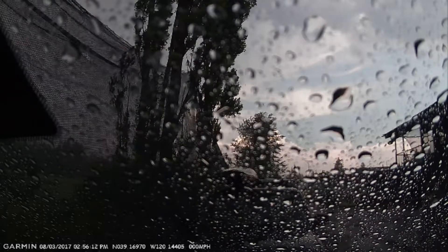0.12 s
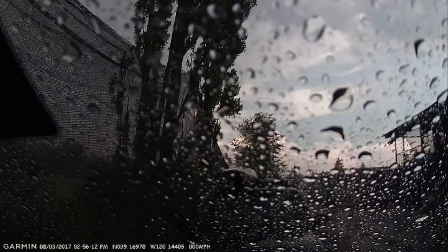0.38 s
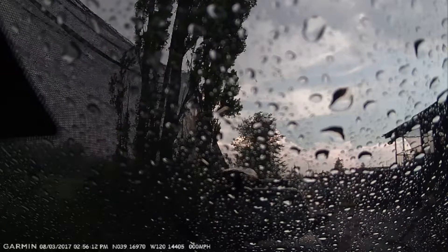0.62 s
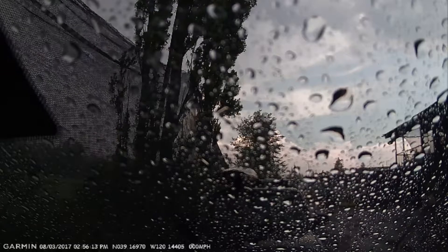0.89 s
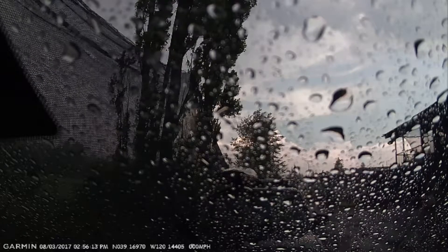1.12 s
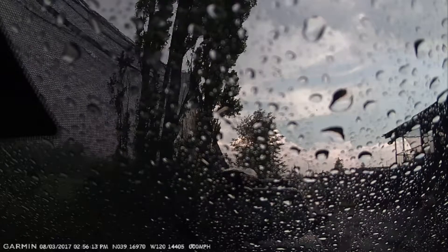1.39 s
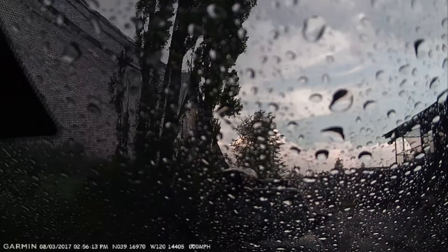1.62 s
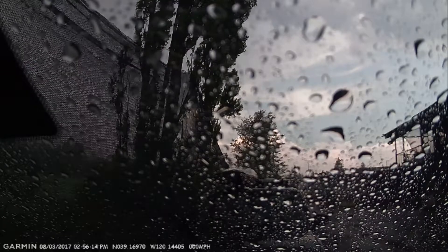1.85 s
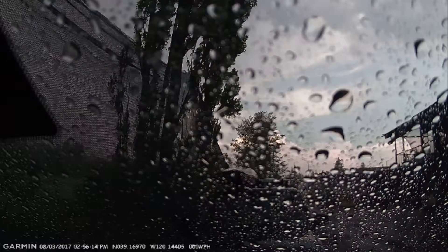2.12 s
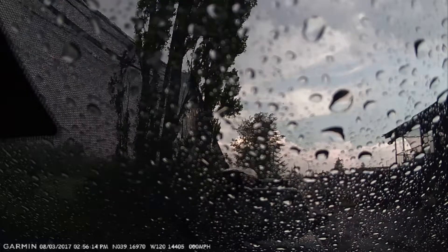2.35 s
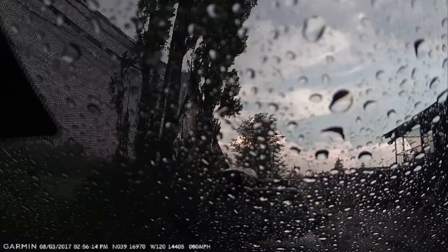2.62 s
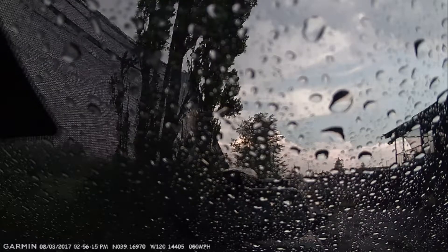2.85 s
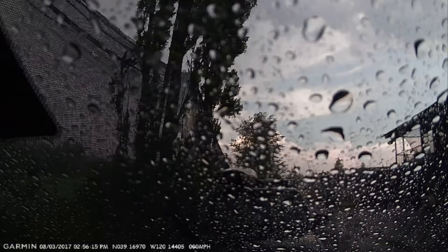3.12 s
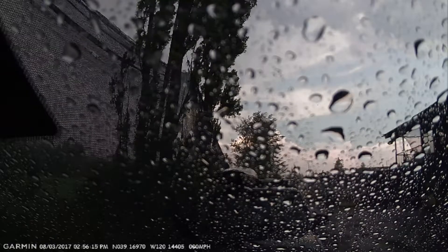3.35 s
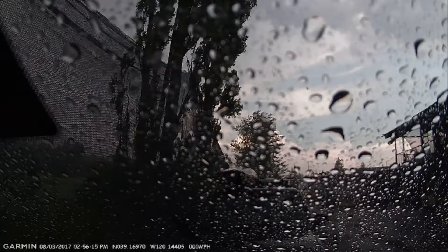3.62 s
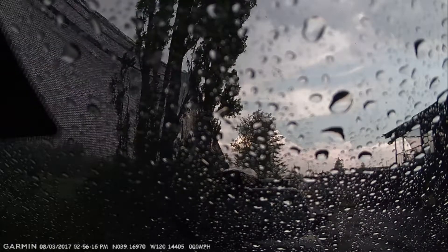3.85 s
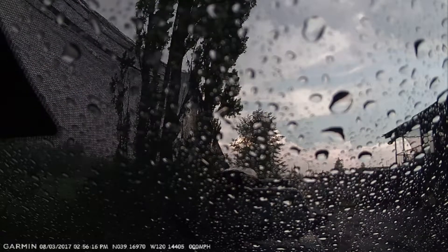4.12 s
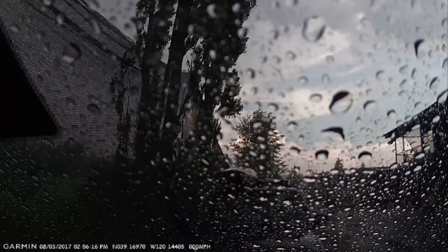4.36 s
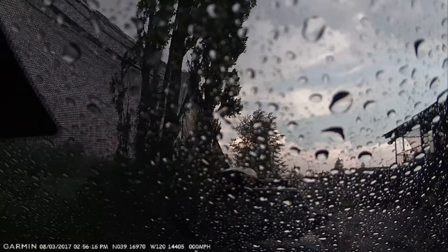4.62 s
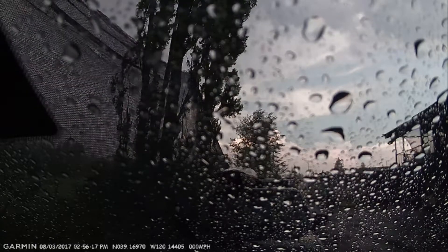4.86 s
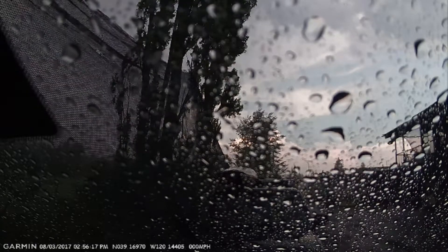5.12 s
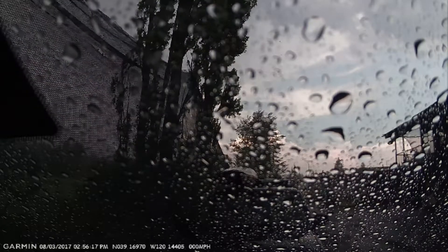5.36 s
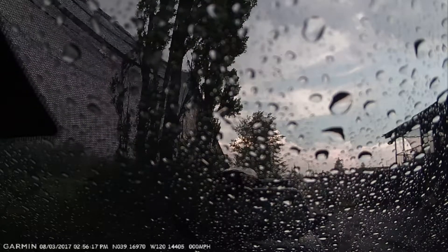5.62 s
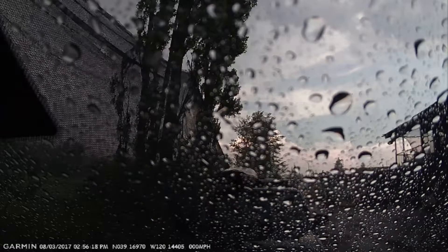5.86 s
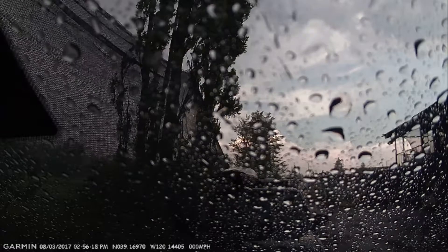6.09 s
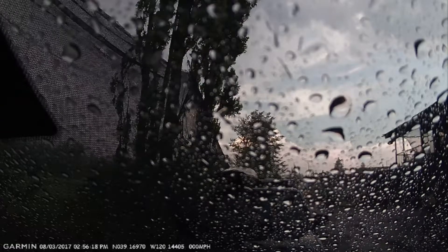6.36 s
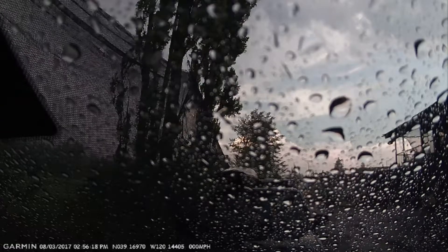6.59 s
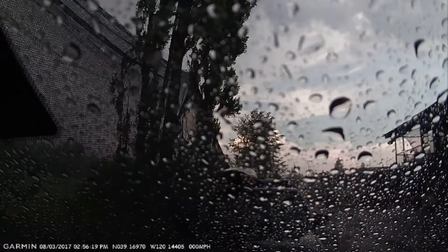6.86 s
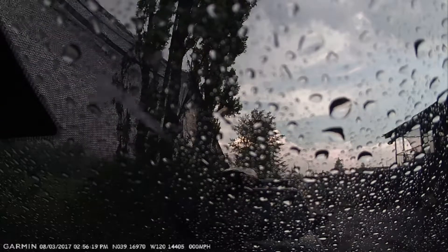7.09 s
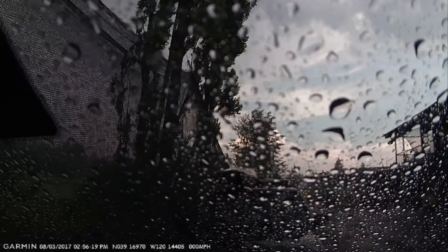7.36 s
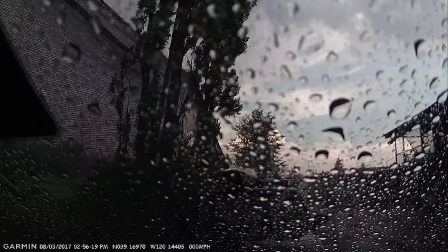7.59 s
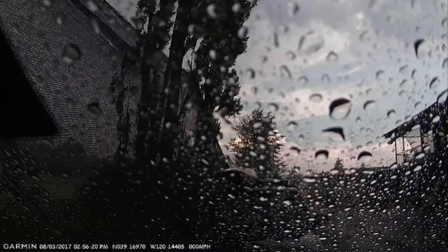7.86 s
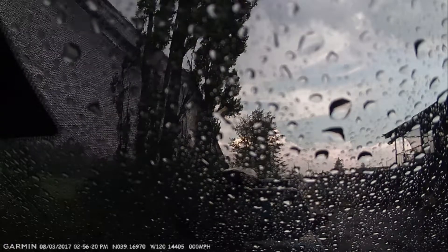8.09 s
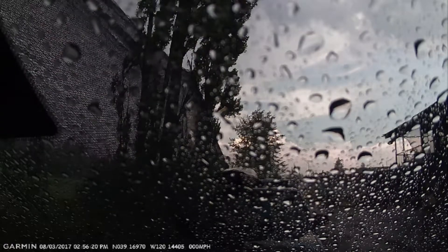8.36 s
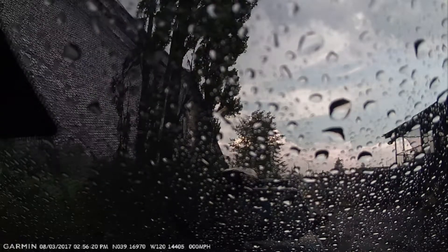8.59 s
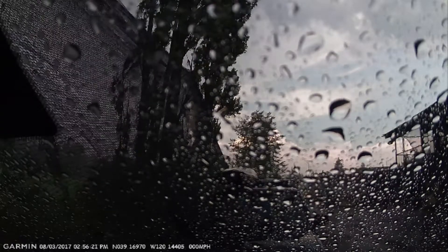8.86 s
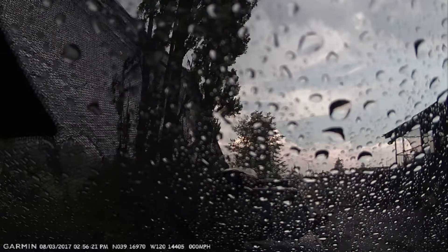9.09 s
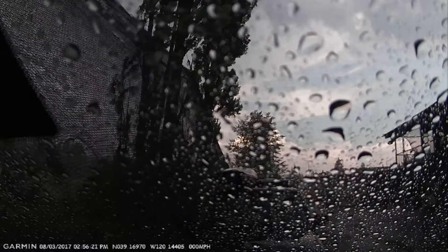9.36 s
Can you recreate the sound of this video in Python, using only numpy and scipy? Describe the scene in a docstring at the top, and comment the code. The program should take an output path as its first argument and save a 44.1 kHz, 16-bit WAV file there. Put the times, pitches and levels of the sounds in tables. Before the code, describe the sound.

Close, dry cabin sound of scattered heavy raindrops hitting glass and sheet metal. Crisp ticks, dull plops and hollow thuds come at random, loud and soft mixed, thinning out after two seconds and then becoming busier. Behind them a fine patter ebbs and swells, over the quiet bassy wash of rain outside and light microphone hiss. The rain continues to the end, thickest in the final second, with no engine or wipers.

```python
"""Large raindrops strike the windshield and roof of a parked car, heard by a small microphone in the cabin.
Blows fall throughout, most thickly in the last second; the hardest come near 1.8 s and 5.8 s.
Each drop is a short tick and a cabin echo that dies faster in the treble; some thump or boom the panels.
Throughout, small drops patter (strongest at the start, weakest near 2.1 s), built from a few dull impacts.
Under them, shaped noise makes the muffled wash of rain outside and the microphone's hiss."""
import sys
import numpy as np
from scipy import signal
from scipy.fft import rfft, irfft
from scipy.io import wavfile

SR = 44100
rng = np.random.default_rng(int(sys.argv[2]) if len(sys.argv) > 2 else 0)


def to_linear_factor(level_db):
    """Convert decibel levels (scalar or array-like) to linear amplitude factors."""
    exponent = np.asarray(level_db, float) / 20
    return 10 ** exponent


def inscribe(sig):
    """Save sig as 16-bit PCM at rate SR to the path in sys.argv[1].

    A 1-D sig is mono; a 2-D sig holds one channel per row.
    Samples are clipped to [-1, 1] before scaling.
    """
    pcm = np.round(np.clip(np.atleast_2d(sig).T, -1, 1) * 32767)
    wavfile.write(sys.argv[1], SR, pcm.astype(np.int16))


N = 417627
IMPACT_SAMPLES = 6144

# large drops: t/s, blow level/dB, then re blow: low body/dB, treble splash/dB, direct tick/dB
LARGE_DROPS = [(.002, -22.5, 0, -13.5, -10), (0.1814, -21, -9, -5.5, -2.5), (0.3939, -25, 2.5, -5, -15),
               (0.405, -19.5, -32, -14, -3), (0.4326, -23.5, -13, -15, -6), (0.4603, -33.5, -4, -22, -3),
               (0.504, -25.5, -5.5, -19, -21), (0.5661, -16.5, -13, -17, -9), (0.601, -22.5, 1, -22, -10.5),
               (.6907, -33, 6.5, -27, -8), (.715, -19, -3.5, -16, -14), (0.802, -25.5, -19, -20, -18),
               (0.8148, -21, -6, -11, -19), (.828, -17.5, -32, -11.5, -6), (0.8566, -22.5, -13, -12, -15),
               (0.8718, -19.5, -1, -26, -17), (0.9315, -23, -9.5, -6.5, -13),
               (1.0413, -22.5, -9.5, -25, -3), (1.0972, -33.5, -3, -4, -24), (1.1664, -30, -0.5, -10, -3.5),
               (1.2631, -22.5, -10, -24, -8), (1.3258, -22, -5.5, -13.5, -10), (1.365, -44, -1, -27, -9),
               (1.4102, -24, -15, -21, -17), (1.4765, -18, -11.5, -12, 0), (1.5056, -27.5, -17, -11, 1),
               (1.543, -38, -30, -38, -5), (1.591, -34, 2, -39, -10), (1.703, -30, -5, -10, -5),
               (1.7227, -31.5, -4, -7, -0.5), (1.769, -27.5, -22, -27, -6.5), (1.7892, -9.5, -13, -11, -9),
               (1.944, -26, -3.5, -17, -1), (1.9754, -24, -21, -10.5, -5), (2.0372, -37, 6, -26, -10),
               (2.0912, -36.5, -1, -11, -21), (2.236, -33.5, -17, -19, -10), (2.2551, -32, -1.5, -24, -6),
               (2.2976, -27.5, -16, -2.5, -4), (2.505, -26.5, -11, -17.5, 1.5),
               (2.5459, -30.5, -2, -45, -4.5), (2.611, -28.5, -11.5, -9.5, -18),
               (2.7757, -25, -10, -16, -4.5), (2.815, -19.5, -6.5, -23, -12.5), (2.832, -14.5, -17, -8, -2),
               (2.8874, -18, -15, -8.5, 2), (2.996, -32, -8, -18, -6), (3.0648, -19, -12.5, -18, -7.5),
               (3.0908, -33, -0.5, -14, -4), (3.1254, -42, -18, -12, -6), (3.266, -36.5, -6, -7, -7),
               (3.311, -32, -1.5, -27, -24), (3.394, -31, -10, -10, -10.5), (3.438, -25, -6, -15, -18),
               (3.5763, -31, -10, -22, -19), (3.6089, -16, -5.5, -14.5, -7.5), (3.7585, -36, 9, -19, 0),
               (3.7753, -15.5, -7.5, -18, -5), (3.868, -35, -6, -14, 0.5), (3.9299, -15, -14.5, -11.5, -1),
               (4.0025, -39, -21, -2, -24), (4.03, -30, -8.5, -14, -8), (4.0535, -32, -16, -8.5, 5),
               (4.08, -32, -36, -4.5, -17), (4.1487, -35, -19, -5, 0.5), (4.1872, -14.5, -4.5, -12, 10),
               (4.2993, -37, -19, -5, -13), (4.3333, -15, -12.5, -25, -13), (4.4517, -35, -2.5, -39, -6),
               (4.4942, -32, -7, -17, -29), (4.5338, -20, 1.5, -38, -11), (4.617, -24, -12, -3.5, -6),
               (4.6285, -14, -12, -11, -2.5), (4.6805, -20, -9.5, -48, -5.5), (4.7256, -33, -7, -3.5, -15),
               (4.794, -23.5, -10.5, -15, -17), (4.8957, -21, -12, -6.5, -10), (5.044, -15, -11.5, -19, -6),
               (5.0883, -37.5, 4, -25, -22), (5.1287, -19.5, -15, -9, -9), (5.1331, -15, -14.5, -5, -2),
               (5.184, -39, 1, -14, -11), (5.2068, -21, -8, -17, -12), (5.244, -17.5, -10, -8, -2.5),
               (5.468, -27, -4, -31, -14), (5.543, -29.5, -18, -10, -5), (5.5642, -23.5, -11.5, -4, -1.5),
               (5.695, -30, -3, -12, -21), (5.7051, -24.5, -3, -14, -12), (5.714, -18.5, -5.5, -25, -16),
               (5.7949, -10.5, -10.5, -5.5, 0), (5.879, -20.5, -7, -9.5, -15), (5.9327, -30, -15, -9, -2),
               (5.992, -29, -8, -12, -9), (6.0006, -17.5, -12.5, -6.5, -2), (6.109, -32.5, -21, -15, -14),
               (6.1916, -15.5, -7.5, -22, -13), (6.2792, -15, -11.5, -18, -2.5), (6.314, -42, 12, -20, -3),
               (6.3588, -41, 0.5, -9, -11), (6.4856, -29, -18, -13, -5), (6.547, -21, -8, -27, -22),
               (6.562, -17.5, -27, -5, -2.5), (6.6604, -16, -12.5, -12.5, -0.5), (6.795, -38, -7, -15, -10),
               (6.8076, -43.5, -24, -3, 6), (6.8559, -16, -13.5, -27, -5.5), (6.8973, -22.5, -17, -2.5, -6),
               (6.999, -21.5, -8.5, -10, 1), (7.0622, -26, -14, -12, -15), (7.1192, -24.5, -14, -8.5, -4.5),
               (7.2471, -41, 0.5, -26, -3), (7.401, -18.5, -9, -25, -15), (7.4895, -18, -9.5, -12.5, -12),
               (7.5348, -20, -13, -3, -9), (7.6657, -17.5, -13.5, -4.5, -3), (7.7443, -44, -16, -20, -17),
               (7.7581, -18, -8.5, -12, -16), (7.772, -15.5, -18, -9, -4), (7.815, -44, 4, -8, 7),
               (7.8292, -17, -9.5, -15, -3.5), (7.8888, -25, 1, -15, -15), (8.0282, -29.5, -42, -0.5, -15),
               (8.0721, -29.5, -14, -0.5, -20), (8.1178, -22, -4.5, -14, -11.5),
               (8.1877, -30, -44, 2.5, -12), (8.2628, -25.5, -4.5, -28, -8.5), (8.33, -16.5, -22, -20, 2),
               (8.3641, -36, -10, -19, -1), (8.3925, -41.5, -3, -22, -5), (8.542, -36, -5, -16, -7),
               (8.5812, -31.5, -33, -3.5, -4), (8.5998, -20, -11, -6, -9), (8.6314, -24, -2, -13, -3),
               (8.6664, -18, -2.5, -14.5, -7), (8.7145, -33, -6, -9, -32), (8.785, -16.5, -12.5, -4, -7),
               (8.8157, -21.5, -12.5, -9, -11), (8.9127, -23.5, -8.5, -17, -1),
               (8.9315, -21.5, -16, -13, -27), (8.978, -22, -5, -15, -28), (9.0274, -22.5, -9, -13, 4),
               (9.051, -24.5, -15, -9, -4), (9.1234, -36.5, -12, -9, -7.5), (9.156, -35, -15, -4, -6),
               (9.1657, -16.5, -21, -4, -4.5), (9.1948, -26, -13, -11, 1.5), (9.244, -24, -14, -4.5, -2.5),
               (9.283, -26, -14.5, -7, -14), (9.3168, -28.5, -6.5, -16, -28), (9.341, -22.5, -2.5, -40, -8),
               (9.402, -29.5, -11, -19, 2.5), (9.4473, -36.5, -9, -12, -12), (9.4615, -23.5, -9, -15, -12)]
# struck panels, small trim to whole roof: t/s, level/dB, f/Hz
PANEL_BLOWS = [(.019, -48, 63.5), (0.177, -25.5, 222), (0.307, -35.5, 188), (0.396, -30, 500),
               (.509, -40, 48.3), (0.605, -29.5, 114), (.688, -28, 657), (.711, -26.5, 235),
               (0.872, -27.5, 40.4), (.881, -29, 157), (1.165, -31, 110.4), (1.264, -28.5, 730),
               (1.308, -40, 59.5), (1.337, -34.5, 133), (1.465, -23, 770), (1.468, -29, 220),
               (1.713, -28.5, 237), (1.787, -28.5, 202), (1.79, -23, 383), (1.936, -25.5, 391),
               (2.329, -31.5, 213), (2.78, -24, 730), (2.812, -29, 245), (2.997, -40.5, 114.7),
               (3.31, -39, 240), (3.33, -43, 49.6), (3.513, -39, 144), (3.607, -21.5, 420),
               (3.766, -36, 268), (3.925, -32.5, 152), (3.931, -28, 364), (4.185, -40, 610),
               (4.194, -28, 145), (4.216, -32, 44.8), (4.331, -19, 525), (4.333, -18, 1340),
               (4.53, -21.5, 137), (4.533, -23.5, 400), (4.628, -22.5, 530), (4.681, -30, 377),
               (4.891, -36.5, 39.6), (4.891, -37.5, 123.5), (5.038, -41, 112), (5.248, -33.5, 194),
               (5.564, -31, 595), (5.709, -38, 97), (5.79, -32, 218), (5.793, -14, 795), (5.874, -29, 187),
               (6.19, -16, 469), (6.275, -28.5, 209), (6.278, -29, 422), (6.547, -29, 177),
               (6.66, -22, 530), (6.857, -33.5, 171), (6.997, -38, 217), (6.999, -26, 760),
               (7.398, -26.5, 1050), (7.401, -31, 43), (7.401, -37.5, 137.5), (7.485, -44, 103),
               (7.661, -41, 192), (7.77, -26, 370), (7.824, -34, 190), (7.829, -24, 592),
               (7.895, -31, 38.4), (7.9, -37, 218), (8.116, -36, 122), (8.261, -34, 674),
               (8.599, -23.5, 840), (8.646, -41, 35.7), (8.664, -28, 177), (8.69, -34, 113.7),
               (8.786, -27, 496), (8.986, -38, 44.2), (9.299, -42, 42.6), (9.342, -28, 553),
               (9.346, -37, 123)]
# modes of glass and trim rung by every blow: f/Hz, relative level/dB, t60/s
TRIM_MODES = [(344.2, -14, 0.57), (382.6, -9.5, 0.17), (495.5, -7, 0.21), (658.5, -6.5, 0.11),
              (757, -9, 0.15), (1012, -4, 0.061), (1348, -2, 0.052)]
# cabin echo bands: f/Hz, relative level/dB, nominal t60/s, nominal rise/s (both vary with the tick)
CABIN_BANDS = [(177, -6.5, 0.39, 0.0044), (323, -5.5, 0.17, 0.0025), (607, -3.5, 0.11, 0.0019),
               (854, -6.5, 0.092, 0.002), (1384, -12.5, 0.063, 0.0016), (2230, -8, 0.053, 0.0024),
               (3660, -11, 0.049, 0.0015), (5540, -14.5, 0.054, 0.00022), (8070, -6.5, 0.046, 0.0012),
               (13300, -6, 0.027, 0.00096)]
# strength of the small patter: t/s, level/dB
PATTER_LEVELS = [(0, -39), (.25, -45), (.7, -51.5), (1.15, -52.5), (1.8, -41), (2.1, -60), (2.4, -44.5),
                 (3.1, -57.5), (3.7, -44), (4.3, -51.5), (5.0, -49.5), (5.6, -55), (6.2, -48.5), (6.8, -53),
                 (7.8, -53.5), (8.5, -54.5), (9.001, -50), (9.47, -51)]
# spectrum of wash and hiss: f/Hz, relative level/dB per Hz
WASH_SPECTRUM = [(15, -51), (25, 16), (45, 13.5), (85, 1), (202, 10), (296, -7.5), (746, -16.5), (902, -43),
                 (979, -14.5), (2670, -16.5), (6040, -21), (15200, -20.5), (16500, -61)]


def evened(x):
    """Scales to rms 1 along time."""
    return x / np.sqrt(np.mean(x ** 2, axis=-1, keepdims=True) + 1e-20)


def add(mix, start_s, sound):
    """Mixes a sound in at a time."""
    part = mix[max(round(start_s * SR), 0):][:len(sound)]
    part += sound[:len(part)]


def drops():
    """Large drops: nearer ones tick higher; each breaks up into a later droplet, stronger after soft drops."""
    mix = np.zeros(N)
    start_s, blow_db, body_db, splash_db, tick_db = np.transpose(LARGE_DROPS)
    chance = rng.random((len(start_s), 3))
    # dull drops with less splash sit lower: 42 dB per octave, scattered over 0.3 octave
    octaves = 0.3 * (chance[:, :2] - 0.5) + splash_db[:, None] / 42
    dull_hz = 2580 * 2 ** octaves
    near_hz = 2970 * 2 ** (tick_db / 13)  # 13 dB of direct tick per octave
    tick_hz = np.maximum(near_hz, dull_hz[:, 0])
    droplet_db = blow_db + np.minimum(-14.5 - 0.38 * tick_db, 0)
    delay_s = 0.004 + 0.016 * chance[:, 2]
    first = impacts(blow_db, body_db, splash_db, tick_hz, tick_db)
    second = impacts(droplet_db, body_db, splash_db, dull_hz[:, 1], np.minimum(tick_db, -14))
    for at_s, drop, droplet, late_s in zip(start_s, first, second, delay_s):
        add(mix, at_s, drop)
        add(mix, at_s + late_s, droplet)
    return mix


def impacts(blow_db, body_db, splash_db, tick_hz, tick_db):
    """One row per drop: a tick of a few cycles, cabin echoes and ringing trim."""
    t = np.arange(IMPACT_SAMPLES) / SR
    echo = cabin_echo(t, body_db, splash_db, tick_hz, tick_db)
    echo += trim_ring(t, body_db)
    direct = direct_tick(t, splash_db, tick_hz)
    return to_linear_factor(blow_db)[:, None] * (0.39 * echo + to_linear_factor(tick_db)[:, None] * direct)


def direct_tick(t, splash_db, tick_hz):
    """The blow itself: a sine that peaks after a cycle or two, and a splash snap of a fraction of a ms."""
    late_s = np.maximum(t - 0.0006, 0)
    turns = tick_hz[:, None] * late_s
    swell = turns / 1.2
    tick = swell * np.exp(1 - swell) * np.sin(2 * np.pi * turns)
    snap = 9 * np.diff(np.exp(-((late_s - 0.0003) / 0.00004) ** 2), prepend=0)
    return tick + to_linear_factor(splash_db)[:, None] * snap


def cabin_echo(t, body_db, splash_db, tick_hz, tick_db):
    """Scattered echoes from glass, seats and trim, separate at first, merging as they multiply."""
    count = len(tick_hz)
    hz = np.fft.rfftfreq(IMPACT_SAMPLES, 1 / SR)
    chance = rng.random((count, IMPACT_SAMPLES, 2))
    density = np.minimum(0.15 + 30 * t, 1)
    signs = np.sign(chance[..., 0] - 0.5)
    echoes = signs * (chance[..., 1] < density) / np.sqrt(density)
    # the drop spatters: ragged clumps of 64 samples, 1 dB scatter
    clumps_db = rng.standard_normal((count, IMPACT_SAMPLES // 64))
    echoes *= to_linear_factor(np.repeat(clumps_db, 64, axis=1))
    spectrum = rfft(echoes)
    centres = np.log(np.transpose(CABIN_BANDS)[0])
    # drops heard only by their echo start softly and linger
    blur = to_linear_factor(-0.6 * np.clip(tick_db + 2, -18, 4))[:, None]
    first_bounces = 1 + 1.1 * np.exp(-t / 0.0043)
    out = np.zeros(echoes.shape)
    for k, (band_hz, db, t60_s, rise_s) in enumerate(CABIN_BANDS):
        share = np.interp(np.log(hz + 1), centres, np.arange(len(CABIN_BANDS)) == k)
        share = share * np.minimum(hz / 130, 1) ** 2
        low = np.clip(np.log(1500 / band_hz) / np.log(2.2), 0, 1)
        high = np.clip(np.log(band_hz / 4500) / np.log(1.9), 0, 1)
        # the struck spot rings on into the echo
        ring_db = 4.23 * np.exp(-(np.log(band_hz / tick_hz) / 0.59) ** 2)
        gain = to_linear_factor(db + low * body_db + high * splash_db + ring_db)
        rise = 1 - np.exp(-t / (rise_s * blur))
        decay = to_linear_factor(-60 * t / (t60_s * blur ** 0.3))
        band = evened(irfft(spectrum * np.sqrt(share), IMPACT_SAMPLES))
        out += gain[:, None] * rise * decay * first_bounces * band
    return out


def trim_ring(t, body_db):
    """Decaying modes of glass and trim; where the drop lands decides which speak and shifts their pitch."""
    spot = rng.random((len(body_db), len(TRIM_MODES), 2))
    out = np.zeros((len(body_db), len(t)))
    for k, (mode_hz, db, t60_s) in enumerate(TRIM_MODES):
        shifted_hz = mode_hz * (1 + 0.056 * (spot[:, k, :1] - 0.5))
        swing = np.sin(2 * np.pi * shifted_hz * t) * (1 - np.exp(-mode_hz * t))
        spot_db = 6.5 - 20 * spot[:, k, 1:]
        out += to_linear_factor(db + body_db[:, None] + spot_db - 60 * t / t60_s) * swing
    return out


def panels():
    """A struck panel swings up over a cycle and rings down, beating with a shorter neighbouring mode."""
    mix = np.zeros(N)
    for (start_s, db, hz), phase in zip(PANEL_BLOWS, rng.random((len(PANEL_BLOWS), 1))):
        t60_s = 0.36 * (120 / hz) ** 1.31  # small high panels are damped sooner
        t = np.arange(0, t60_s, 1 / SR)
        main = to_linear_factor(-60 * t / t60_s) * np.sin(2 * np.pi * hz * t)
        other = to_linear_factor(-7 - 110 * t / t60_s) * np.sin(2 * np.pi * (1.42 * hz * t + phase))
        swing_up = 1 - np.exp(-hz * t / 0.37)
        add(mix, start_s, to_linear_factor(db) * swing_up * (main + other))
    return mix


def patter():
    """Many small and distant drops, dull and soft, each nudging a panel; a few are larger."""
    kind_count, rate_per_s, spread_db = 16, 140, 5.5
    chance = rng.random((5, kind_count))
    t = np.arange(IMPACT_SAMPLES) / SR
    body_db = -4 + 9.7 * (chance[0] - 0.5)
    splash_db = -24 + 7.1 * (chance[1] - 0.5)
    tick_hz = 2000 * 1.18 ** chance[2]
    tick_db = -26 + 10 * chance[3]
    kinds = impacts(np.zeros(kind_count), body_db, splash_db, tick_hz, tick_db)
    panel_hz = 95 * 1.53 ** chance[4][:, None]
    kinds += to_linear_factor(-6 - 60 * t / 0.11) * np.sin(2 * np.pi * panel_hz * t)
    size = to_linear_factor(spread_db * np.minimum(rng.exponential(1, N), 3))
    hits = size * (rng.random(N) < rate_per_s / SR)
    kind = rng.integers(0, kind_count, N)
    mix = np.zeros(N)
    for k in range(kind_count):
        mix += signal.oaconvolve(hits * (kind == k), kinds[k])[:N]
    at_s, db = np.transpose(PATTER_LEVELS)
    return to_linear_factor(np.interp(np.arange(N) / SR, at_s, db)) * evened(mix)


def wash():
    """Rain outside through the closed body, its bass swelling with the patter, and microphone hiss on top."""
    level_db, bass_hz = -49, 350
    f_hz, db = np.transpose(WASH_SPECTRUM)
    hz = np.fft.rfftfreq(N, 1 / SR)
    shape = to_linear_factor(np.interp(np.log(hz + 1), np.log(f_hz + 1), db))
    noise = rfft(rng.standard_normal(N)) * shape
    bass = irfft(noise / (1 + (hz / bass_hz) ** 2), N)
    at_s, patter_db = np.transpose(PATTER_LEVELS)
    swell = to_linear_factor(0.67 * np.interp(np.arange(N) / SR, at_s, patter_db - patter_db.mean()))
    return to_linear_factor(level_db) * evened(irfft(noise, N) + (swell - 1) * bass)


def scene():
    """All the rain as it reaches the microphone, one channel."""
    return (drops() + panels() + patter() + wash())[None]


def low_pass(x):
    """Removes everything above the highest recorded frequency."""
    return signal.sosfilt(signal.butter(12, 16990, fs=SR, output="sos"), x)


def record(dry):
    """The small microphone rounds off the hardest peaks and cuts the extreme treble."""
    rounded = 0.8 * np.tanh(dry / 0.8)
    lowpass = signal.firwin(191, 15950, fs=SR)
    finished = signal.oaconvolve(rounded, lowpass[None], "same")
    return low_pass(finished)


dry = scene()
out = record(dry)
inscribe(out)
```